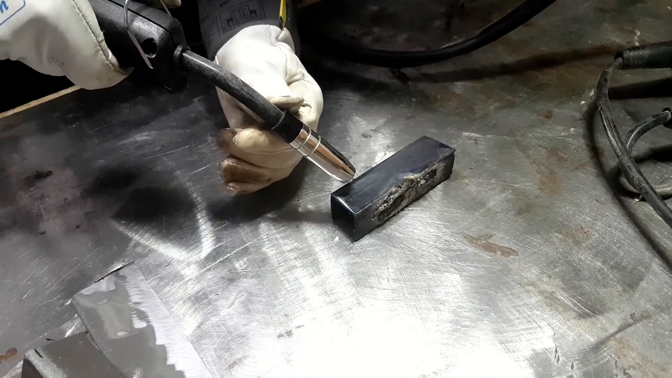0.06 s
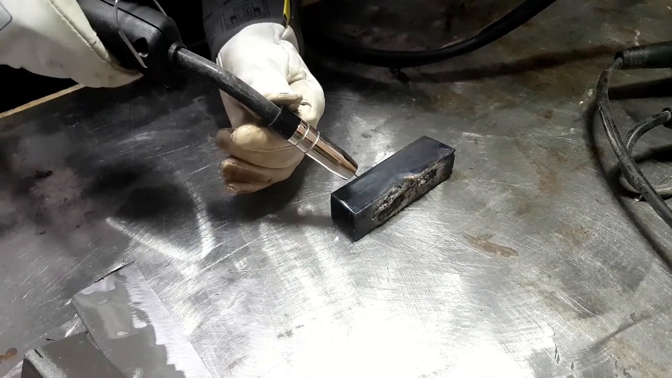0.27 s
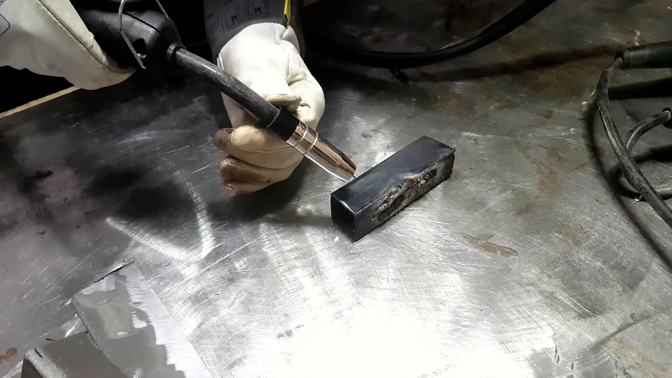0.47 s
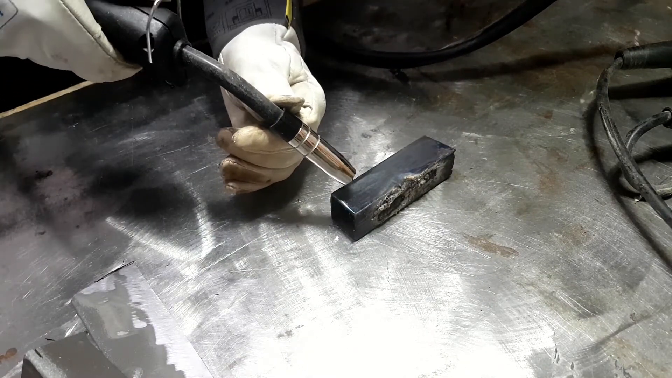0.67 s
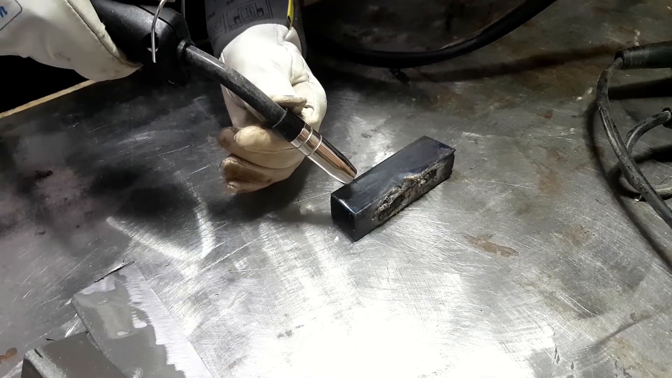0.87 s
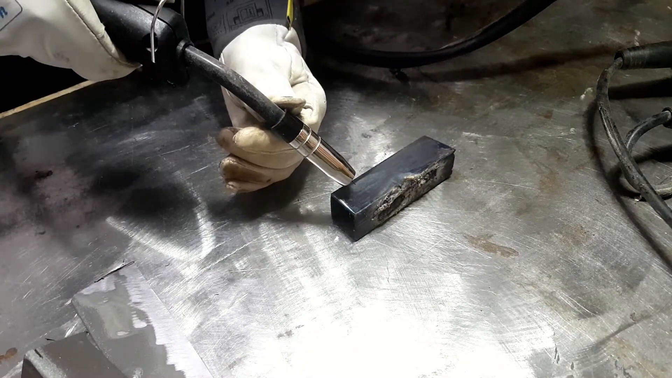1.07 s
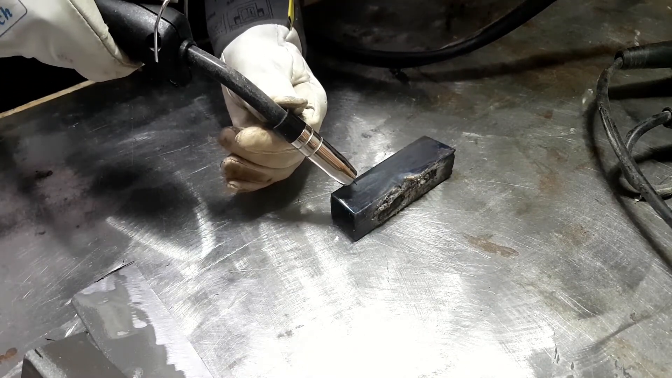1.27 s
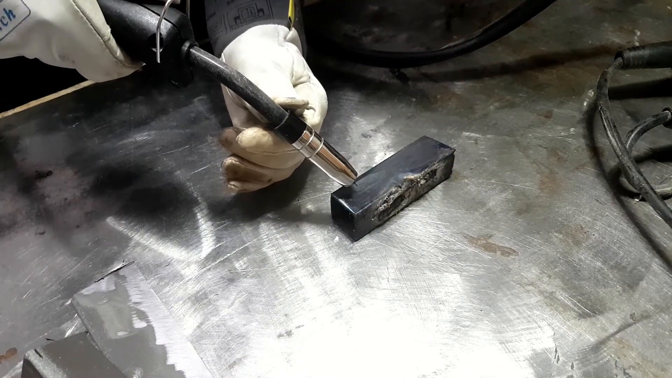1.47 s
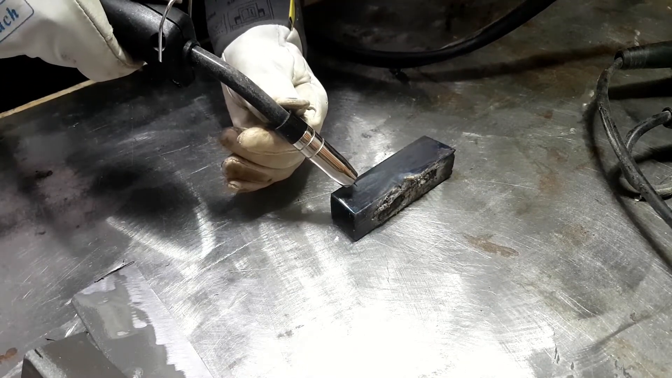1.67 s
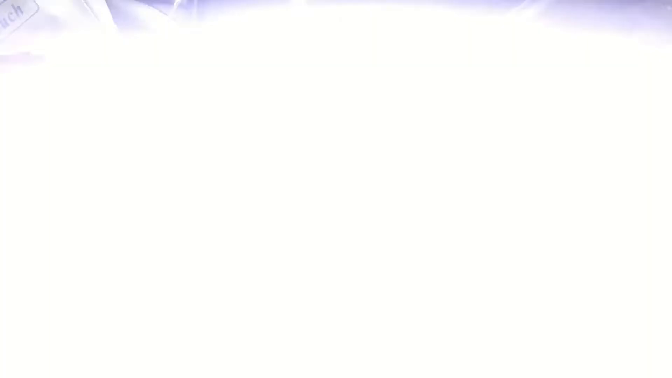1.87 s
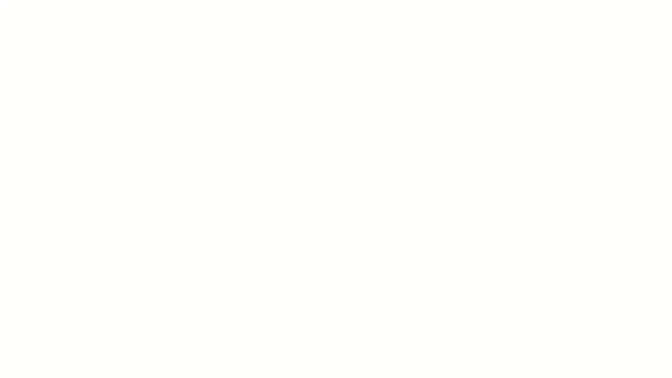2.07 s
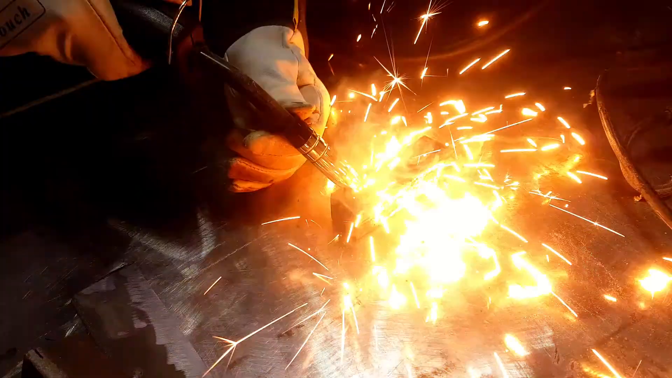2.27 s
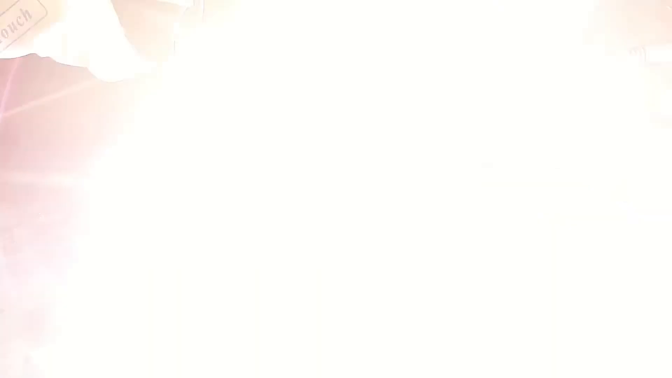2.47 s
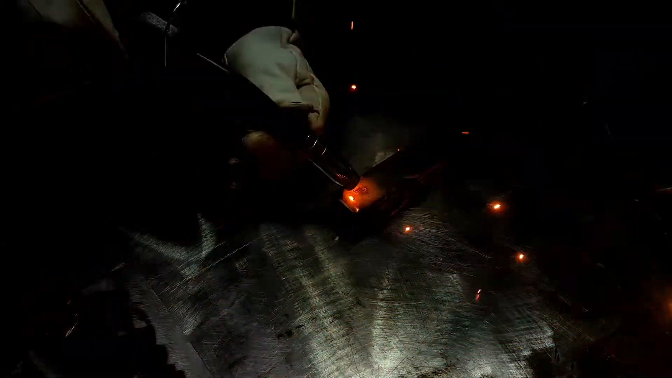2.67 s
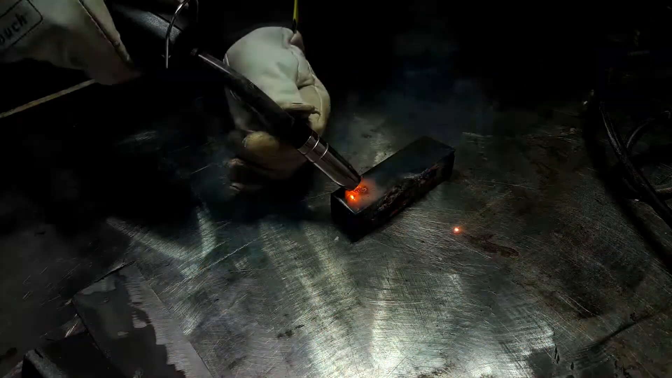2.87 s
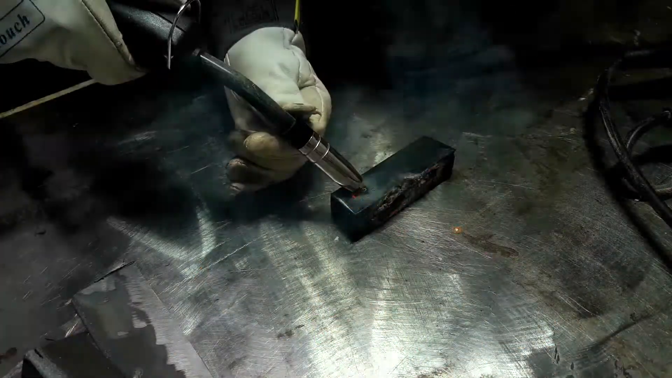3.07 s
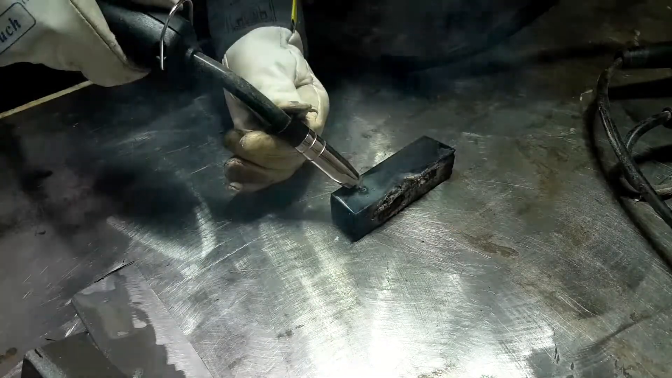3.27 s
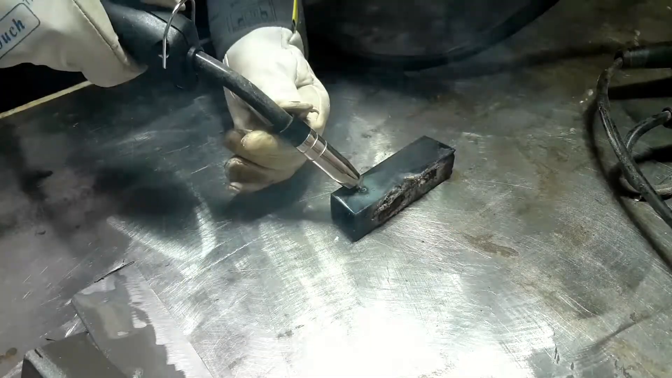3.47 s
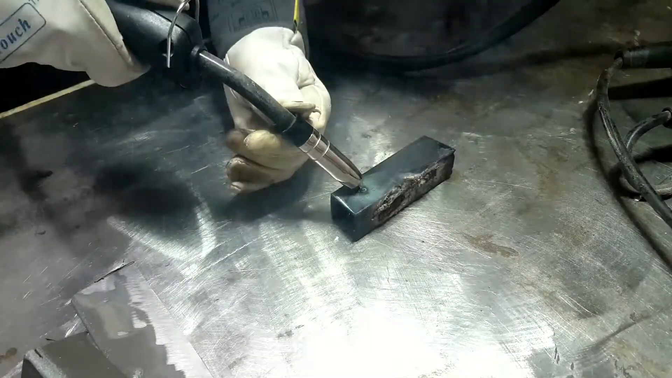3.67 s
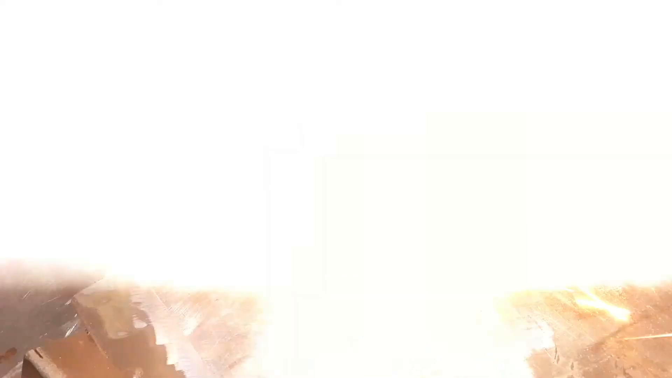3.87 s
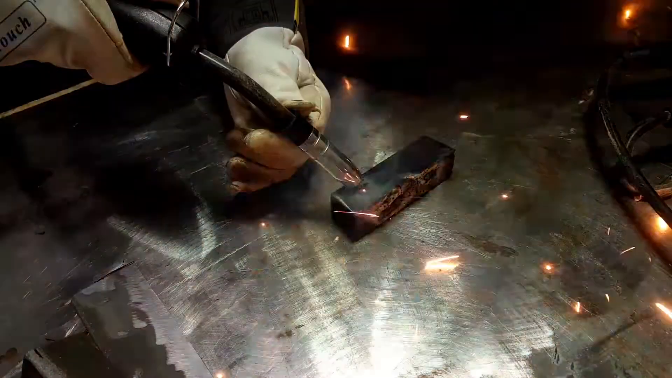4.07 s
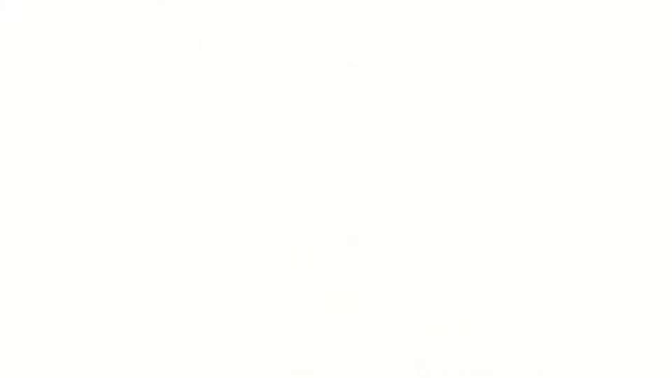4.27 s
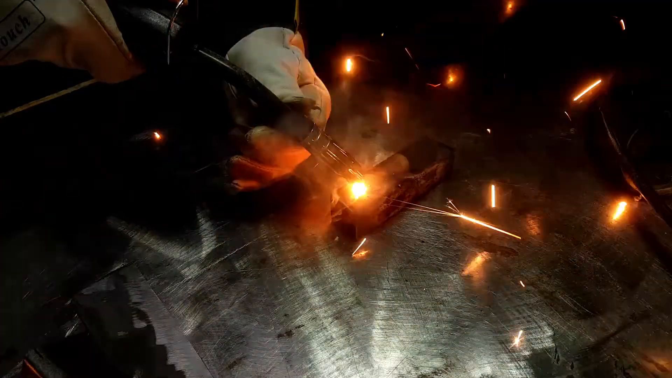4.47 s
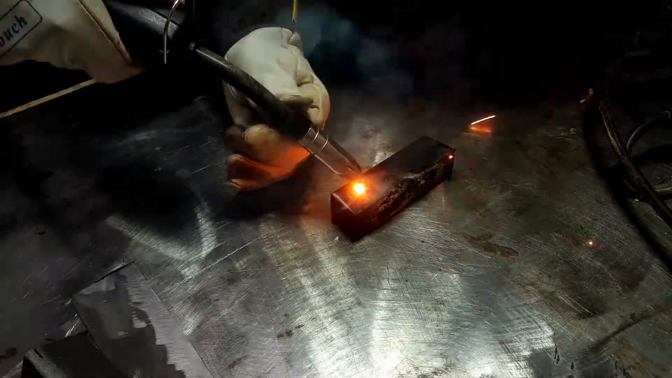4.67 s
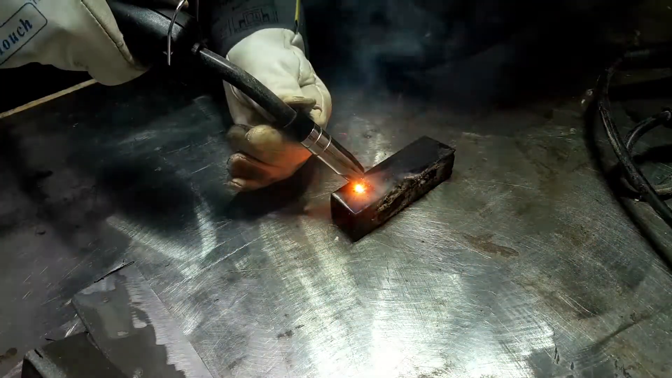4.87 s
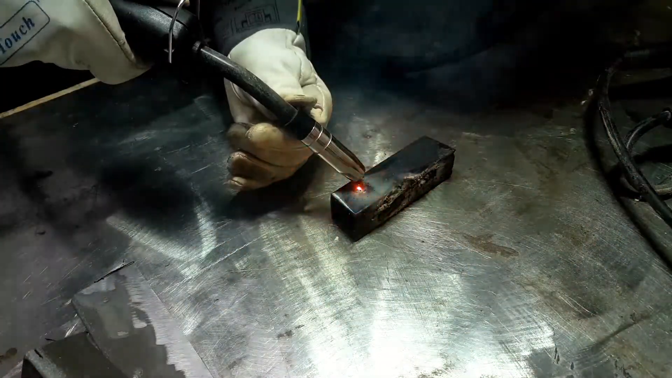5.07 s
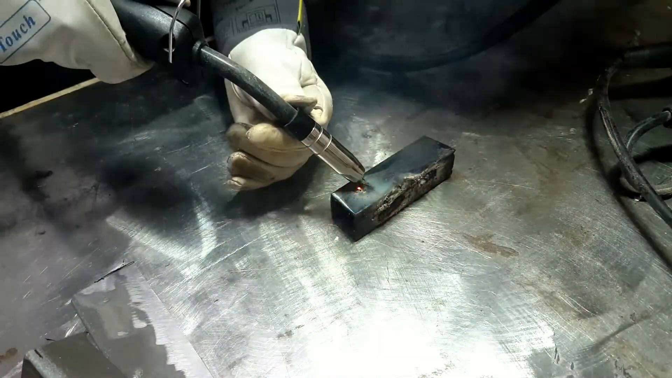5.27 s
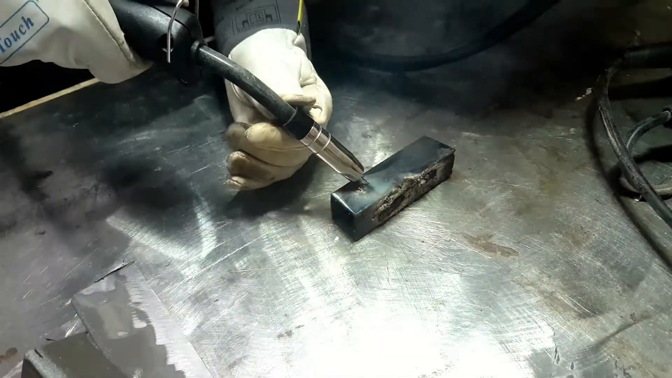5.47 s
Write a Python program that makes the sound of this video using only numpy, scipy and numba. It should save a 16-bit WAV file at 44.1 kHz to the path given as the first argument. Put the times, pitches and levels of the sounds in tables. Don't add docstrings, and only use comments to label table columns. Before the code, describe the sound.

Close up in a small workshop, sharp sputtering welding bursts pop and sizzle, separated by a humming fan, trigger clicks and dull metal clunks.

```python
import sys
import numpy as np
from scipy import signal
from scipy.fft import rfft, irfft, next_fast_len
from scipy.io import wavfile
from scipy.ndimage import uniform_filter1d, map_coordinates
from numba import njit

SR = 44100
rng = np.random.default_rng(int(sys.argv[2]) if len(sys.argv) > 2 else 0)


def wav_record(signal):
    frames = np.transpose(np.atleast_2d(signal))
    bounded = np.clip(frames, -1, 1)
    quanta = np.round(bounded * 32767).astype(np.int16)
    wavfile.write(sys.argv[1], SR, quanta)


def invert_db(level):
    return 10 ** (np.asarray(level, dtype=float) / 20)


N = 243873

# t/s, level/dB
FAN_GAIN = [(0, -1), (1.85, -1.5), (2.3, -1), (2.6, -7.5), (2.95, -5.5), (3.2, -2), (3.95, -1), (4.2, -5.5),
            (4.78, -10), (5.0, -4.5), (5.53, -0.5)]
# multiple/1, level/dB, left-right/dB
FAN_LINES = [(1, -72.5, 1.5), (4, -57, 1), (4.88, -79.5, -10), (6.938, -50.5, -7), (12, -71.5, -10),
             (14, -54.5, -3), (16, -65, 5), (20, -69.5, 4), (24, -62.5, 0.5), (28, -70.5, 7),
             (35, -74, -1.5)]
# f/Hz, density/dB
AIR_TONE = [(20, -21), (45, -13.5), (110, -12.5), (160, -11.5), (225, -2), (285, -5.5), (420, -5),
            (485, -4.5), (530, -12.5), (940, -16), (1100, -18.5), (3000, -28), (8500, -43.5), (15500, -46)]
# f/Hz, left-right/dB
AIR_LEFT = [(100, -4), (200, -1.5), (380, -2.5), (700, 2.5), (1300, -0.5), (15000, 1)]
AIR_DB, FAN_LAG_SAMPLES = -48, 11
SHAFT_HZ, SHAFT_HZ_PER_S = 63.54, .21
OVERTONE_IDLE_DB, OVERTONE_WELD_DB, OVERTONE_SAG = 2.5, -1, 0.63
RUMBLE_DB, WIND_CUT_DB, WIND_CUT_S = 0.5, -11.5, 0.94

# t/s, top peak level/dB, 1.7 kHz ring over top/dB, 3 kHz ring over
# top/dB
TICKS = [(0.371, -51, -7, -11), (1.4528, -40.5, -13, 0), (3.149, -50, -10, -2), (3.153, -40.5, -1.5, -2),
         (3.354, -60, 0, 3), (3.989, -45, -18, -19.5), (4.696, -57.5, -7, 1.5), (4.7, -44, -3, -3)]
# t/s, top peak level/dB, 1.7 kHz ring over top/dB, 3 kHz ring over top/dB
SNAPS = [(1.292, -35, -18, -2.5), (1.2965, -36, -6, -4), (2.7331, -54.5, 16, 11.5), (3.4325, -36, -14, 2.5),
         (3.441, -36, -6, -7), (4.8326, -46.5, -16, 2), (4.838, -41, -20, 1.5), (4.8436, -32, 3.5, 0)]
# t/s, top peak level/dB, 1.7 kHz ring over top/dB, 3 kHz ring over top/dB
TICKS_LEFT = [
    (0.1114, -39.5, 7.8, 10),
    (0.1174, -74, 13, 4),
    (0.5279, -55, 12, 12),
]
# f/Hz, density/dB
TICK_TONES = [
    [(3000, -38), (6500, -29), (8000, -11), (9500, -14.5), (12000, -6), (14500, -5.5), (15800, -6)],
    [(400, -50), (1200, -10), (1700, 0), (2100, -10), (5000, -50)],
    [(1000, -50), (2200, -16), (2600, -4), (3100, -14), (3750, 0), (4400, -14), (9000, -50)],
    [(2500, -69), (5200, -11), (6700, -10.5), (8500, -18), (14000, -32)],
]
# 6.5 kHz ring over top/dB, rattle/s, downward lean of 3 kHz ring/dB
TICK_KINDS = [(-9.5, 0.0036, 1), (-5, 0.0025, 5.5), (6, 0.0019, 0)]
# f/Hz, share/1
TICK_LEAN = [(2700, 1), (3600, -1)]
TICK_TAIL_DB, TICK_TAIL_S = -22, 0.059

# t/s, peak level/dB
CLUNKS = [(1.452, -33.5), (2.731, -34.5), (2.744, -35.5), (2.804, -39.5), (4.537, -46.5), (4.549, -40),
          (4.844, -23.5), (4.851, -29)]
# f/Hz, level/dB, t60/s
CASE_MODES = [(237, 2, 0.059), (313.8, 6.5, 0.11), (447, -29, 0.065), (501, -3, 0.26), (584, -2, 0.12),
              (674, -5, 0.32), (720, 3, 0.064), (910, -49, 0.04)]

# t/s, sizzle level/dB, crater depth/1 (0 flat, 1 deep)
BURNS = [
    [(1.877, -30.5, 0.5), (1.895, -29, 0.01), (1.955, -32.5, 0.2), (1.965, -28.5, 0.3), (2.04, -27, 0.8),
     (2.146, -26, 0.7), (2.204, -26, 1), (2.236, -26, 0.92), (2.256, -41, 0.98)],
    [(2.368, -31.5, 0.5), (2.38, -35.5, .1), (2.391, -24.5, .1), (2.439, -28.5, 0.5), (2.473, -35, 0.9),
     (2.5, -40.5, 0)],
    [(3.728, -21, 0.3), (3.758, -27.5, 0.12), (3.812, -27, 0.85), (3.868, -28.5, .9), (3.878, -24.5, .7),
     (3.89, -45, .7)],
    [(4.213, -36, 0.3), (4.232, -30, 0.01), (4.246, -28, 0.07), (4.324, -40, 1), (4.346, -34, .9),
     (4.36, -47, .8), (4.384, -41, 0.7), (4.395, -59, 0.62)],
]
# f/Hz, density/dB
ARC_TONE = [(40, -27.5), (80, -16), (200, -4.5), (700, -2.5), (1300, 3), (1800, -2), (2500, -3),
            (3800, -1.5), (5500, 0), (9000, -5), (12700, 2), (15500, -4)]
# f/Hz, left-right/dB
ARC_LEFT = [(60, 12.5), (110, 11.5), (200, -2), (380, -21.5), (700, -12), (1290, 1), (2380, 9.5),
            (4400, 2.5), (8120, -4.5), (15000, -8)]
ARC_EDGES = [950, 3400, 7800]
# flat-crater level over sizzle/dB, added when deep/dB
STREAM = [(4, -12.5), (-7.5, 11.5), (-2.5, 0), (3, -7.5)]
# t/s, crack peak level/dB, droplet weight/dB
POPS = [(1.8791, -6, -2), (1.8834, -3, 4.5), (1.8916, -13.5, 2), (1.8986, -15.5, 2.5),
        (1.9081, -8.5, -1.5), (1.9201, -12.5, 3), (1.948, -12, -2.5), (1.9589, -17.5, -6.5),
        (1.9655, -17, -2.5), (1.9859, -15.5, -5), (2.037, -13, -1), (2.0947, -13.5, 3),
        (2.1344, -11.5, 0), (2.148, -9.5, 6), (2.1709, -7.5, -2), (2.1846, -13.5, -3),
        (2.194, -13.5, -2.5), (2.202, -13.5, 1.5), (2.2104, -9.5, 3.5), (2.2173, -10, -2),
        (2.2288, -12.5, 2), (2.233, -5, 10), (2.3705, -1.5, -0.5), (2.3809, -2, 3.5),
        (2.3893, -9.5, 13), (2.403, -14, -2.5), (2.4087, -13, -2), (2.4923, -26.5, -5),
        (2.4965, -21, 13.5),
        (3.7302, -3, 3), (3.7337, -8, 7), (3.751, -9, -0.5), (3.755, -12.5, -7), (3.7777, -11.5, 0),
               (3.789, -9, 5), (3.8008, -7.5, 6.5), (3.817, -9, 1), (3.8239, -15.5, 4.5), (3.8564, -11, 8),
               (3.8766, -11, 9), (4.2162, -5.5, -1), (4.2247, 0, 4), (4.2311, -3.5, 1), (4.2347, -16.5, 12),
               (4.2433, -16.5, 2.5), (4.2611, -18, 1.5), (4.2891, -17, -1), (4.331, -24, 8),
               (4.3457, -19.5, 11), (4.3748, -14, 8.5), (4.3819, -21, 3)]
# level over crack/dB, added when deep/dB, share of droplet weight/1, rattle/s
BLOW = [(-4.5, -8, .9, 0.00091), (-7.5, 7.5, 0.78, 0.0014), (1, 1.5, -1.2, .0007),
        (1.5, 2.5, -1.1, 0.00077)]
# t/s, share/1, f/Hz
WHISTLE = [(1.94, .1, 3050), (1.97, 1.9, 3050), (2.1, 1.1, 3020), (2.135, 0.66, 2450), (2.25, 0.33, 2350),
           (2.37, 0.056, 2350)]
CRATER_FLAT_HZ, CRATER_DEEP_HZ = 1630, 1870
SMALL_POPS_PER_S, SMALL_POP_DB, SMALL_SCATTER_DB = 45, 5.5, 6
PORT_LAG_SAMPLES = 0.71

# t/s, level/dB
SNUFFS = [(2.236, -28.5), (2.497, -21.5), (3.877, -30), (4.383, -32)]
SNUFF_S, REBOUND = 0.00082, 2.8

# t/s, level/dB, decay/s
PUFFS = [(4.215, -14.5, 0.0091)]

# t/s, level/dB
SCRAPE = [(5.519, -59), (5.524, -32.5), (5.53, -18)]
# f/Hz, density/dB
SCRAPE_TONE = [(240, -35), (400, -12), (1840, -3), (2710, -21), (4260, -1), (5220, 2), (5820, -36),
               (14100, -36.5), (16500, -25.5)]

# f/Hz, t60/s
ROOM_T60 = [(60, 0.46), (250, 0.41), (1000, 0.29), (2300, 0.29), (5000, 0.23), (10000, 0.3), (16000, 0.072)]
ROOM_DB = -8.5
BENCH_HZ, BENCH_DB, BENCH_T60_S = 2318, -7, 0.27


def read(table, hz):
    f, v = np.transpose(table)
    return np.interp(np.log(np.maximum(hz, 1)), np.log(f), v)


def colour(x, table, tilt=((1, 0), (2, 0)), share=0):
    hz = np.arange(4097) * SR / 8192
    gain_db = read(table, hz) + share * read(tilt, hz)
    cepstrum = irfft(gain_db * np.log(10) / 20)
    cepstrum[1:4096] *= 2
    cepstrum[4097:] = 0
    h = irfft(np.exp(rfft(cepstrum)))[:4096]
    return signal.fftconvolve(x, h / np.sqrt(np.sum(h ** 2)))[:len(x)]


def band(x, lo_hz, hi_hz):
    hi_hz = min(hi_hz, .45 * SR)
    sos = signal.butter(2, [lo_hz, hi_hz], "band", fs=SR, output="sos")
    return signal.sosfilt(sos, x) * np.sqrt(SR / 2 / (hi_hz - lo_hz))


def walk(rate_hz):
    k = int(SR / rate_hz)
    held = np.repeat(rng.standard_normal(N // k + 1), k)
    return 1.22 * uniform_filter1d(uniform_filter1d(held, k), k)[:N]


def bursts(times_s, dbs, decays_s, noise):
    env = np.zeros(N)
    for s, db, decay_s in zip(times_s, dbs, np.broadcast_to(decays_s, len(times_s))):
        i = int(s * SR)
        age = np.arange(min(12000, N - i))
        env[i:i + len(age)] += invert_db(db) * np.exp(-age / (SR * max(decay_s, 1e-4)))
    return env * noise


def late(x, lag_samples):
    n = np.arange(N)
    return np.array([np.interp(n - lag_samples, n, x), x])


@njit
def svf(x, hz, width_hz):
    y, b, l = np.empty(len(x)), 0., 0.
    for i in range(len(x)):
        g, k = np.tan(np.pi * hz[i] / SR), width_hz / hz[i]
        v = (b + g * (x[i] - l)) / (1 + g * (g + k))
        b, l, y[i] = 2 * v - b, l + 2 * g * v, k * v
    return y


def slices(edges_hz):
    hz = np.arange(next_fast_len(N) // 2 + 1) * SR / next_fast_len(N)
    below = [0 * hz] + [1 / (1 + (hz / e) ** 6) for e in edges_hz] + [0 * hz + 1]
    return np.diff(below, axis=0)


def fan_lines(shaft_hz, overtone_db, rumble_db):
    turn = 2 * np.pi * np.cumsum(shaft_hz * (1 + .002 * walk(6))) / SR
    lines = 0
    for k, db, left_db in FAN_LINES:
        db = db + 1.4 * walk(24.915) + overtone_db * (k > 7) + rumble_db * (k < 5)
        tone = np.sqrt(2) * invert_db(db) * np.sin(round(k) * turn + 2 * np.pi * rng.random())
        lines = lines + invert_db([[left_db / 2], [-left_db / 2]]) * tone
    lines[0] = np.roll(lines[0], FAN_LAG_SAMPLES)
    return lines


def fan_air(rumble_db):
    noise = rng.standard_normal((3, N))
    high = signal.butter(1, 500, "high", fs=SR, output="sos")
    around = signal.sosfilt(high, noise[1:]) + 0.3 * noise[1:]
    left, right = late(noise[0], FAN_LAG_SAMPLES) + 1.41 * around
    air = np.array([colour(left, AIR_TONE, AIR_LEFT, share=.5), colour(right, AIR_TONE, AIR_LEFT, share=-.5)])
    bass = signal.sosfiltfilt(signal.butter(2, 270, fs=SR, output="sos"), air)
    air = air - bass * (1 - invert_db(rumble_db + 0.5 * walk(5.6)))
    return invert_db(AIR_DB + walk(3.4)) * air / np.std(air)


def fan():
    t = np.arange(N) / SR
    gain_db = np.interp(t, *np.transpose(FAN_GAIN))
    weld_db = OVERTONE_WELD_DB + OVERTONE_SAG * gain_db
    overtone_db = np.where(t < BURNS[0][0][0], OVERTONE_IDLE_DB, weld_db)
    rumble_db = RUMBLE_DB + WIND_CUT_DB * np.clip((t - PUFFS[0][0]) / WIND_CUT_S, 0, 1)
    lines = fan_lines(SHAFT_HZ + SHAFT_HZ_PER_S * t, overtone_db, rumble_db)
    return invert_db(gain_db) * (lines + fan_air(rumble_db))


def ticks():
    out = 0
    tables, lags = (TICKS, SNAPS, TICKS_LEFT), (FAN_LAG_SAMPLES, FAN_LAG_SAMPLES, -8)
    for k, tone in enumerate(TICK_TONES):
        noise = rng.standard_normal((3, N))
        for table, lag, (high_db, rattle_s, lean_db) in zip(tables, lags, TICK_KINDS):
            s, top_db, low_db, mid_db = np.transpose(table)
            db = top_db + (0, low_db, mid_db, high_db)[k] - 5
            grit = 0.13 * late(noise[0], lag) + 1.01 * noise[1:]
            shake = bursts(s, db, rattle_s, grit) + bursts(s, db + TICK_TAIL_DB, TICK_TAIL_S, grit)
            lean = lean_db * (k == 2)
            out = out + np.array([colour(port, tone, TICK_LEAN, share=lean) for port in shake])
    return out


def clunks():
    out, t = np.zeros(N), np.arange(SR // 4) / SR
    for s, db in CLUNKS:
        ring = 0
        for hz, mode_db, t60_s in CASE_MODES:
            c = rng.standard_normal()
            mode = np.sin(2 * np.pi * hz * t + 3 * c) * 10 ** (-3 * t / t60_s)
            ring = ring + invert_db(mode_db + 4.1 * c) * mode
        ring = ring * (1 - np.exp(-t / 0.0022))
        i = int(s * SR)
        out[i:i + len(t)] += invert_db(db - 2.5) * ring / np.max(np.abs(ring))
    s, db = np.transpose(CLUNKS)
    shake = bursts(s + 0.0022, db - 26.0, 0.031, rng.standard_normal(N))
    rattle = band(band(shake, 280, 1100), 280, 1100)
    return late(out + rattle, FAN_LAG_SAMPLES)


def plasma():
    chance = rng.random((3, N))
    struck = chance[0] < 1500 / SR
    spatter = struck * np.sign(chance[1] - .5) * invert_db(-2.5 * np.log(chance[2] + 1e-9))
    hiss = invert_db(2.73 * walk(150)) * (rng.standard_normal(N) + .9 * rng.standard_normal((2, N)))
    stream = 0.57 * spatter / np.std(spatter) + hiss
    return stream / np.std(stream)


def pops(sizzle_db):
    small = np.flatnonzero((rng.random(N) < SMALL_POPS_PER_S / SR) & (sizzle_db > -100))
    scatter_db = SMALL_SCATTER_DB * (rng.random((2, len(small))) - .5)
    small_db = sizzle_db[small] + SMALL_POP_DB + scatter_db[0]
    big = np.transpose(POPS)
    return np.hstack([big, [small / SR, small_db, 2 * scatter_db[1]]])


def arc():
    t, sizzle_db, n_fft = np.arange(N) / SR, np.full(N, -300.), next_fast_len(N)
    for burn in BURNS:
        s, db, _ = np.transpose(burn)
        on = slice(int(s[0] * SR), int(s[-1] * SR))
        sizzle_db[on] = np.interp(t[on], s, db)
    rows = np.concatenate(BURNS)
    depth = np.interp(t, rows[:, 0], rows[:, 2])
    stream = plasma()
    s, db, weight_db = pops(sizzle_db)
    at = (s * SR).astype(int)
    noise = rng.standard_normal((2, N))
    rattle = noise + 0.45 * noise[::-1]
    parts = []
    for (flat_db, deep_db), (blow_db, sunk_db, heavy, rattle_s), share in zip(STREAM, BLOW, slices(ARC_EDGES)):
        level = invert_db(sizzle_db + flat_db + deep_db * depth)
        pop_db = db + blow_db + sunk_db * depth[at] + heavy * weight_db
        click = np.zeros(N)
        click[at] = invert_db(pop_db - 6.0) / np.mean(share)
        gas = invert_db(-4.0) * level * stream + bursts(s + 0.00016, pop_db - 12, rattle_s, rattle)
        both = click + gas / np.sqrt(np.mean(share ** 2))
        parts.append(irfft(rfft(both, n_fft) * share, n_fft)[:, :N])
    roar, ring, sizzle, top = parts
    crater_hz = CRATER_FLAT_HZ + (CRATER_DEEP_HZ - CRATER_FLAT_HZ) * depth
    crater = np.array([svf(port, crater_hz, 290.0) for port in ring])
    s, share, hz = np.transpose(WHISTLE)
    whistle_hz = np.interp(t, s, hz)
    nozzle = np.interp(t, s, share) * np.array([svf(port, whistle_hz, 290.0) for port in ring])
    return roar + 0.43 * ring + 0.78 * crater + nozzle + sizzle + top


def arc_heard():
    left, right = arc()
    right = map_coordinates(right, [np.arange(N) - PORT_LAG_SAMPLES], mode="mirror")
    left = invert_db(3.5) * colour(left, ARC_TONE, ARC_LEFT, share=0.15)
    right = invert_db(0.17) * colour(right, ARC_TONE, ARC_LEFT, share=0.031)
    return np.array([left, right])


def snuffs():
    t, out = np.arange(N) / SR, 0
    for s, db in SNUFFS:
        age = np.clip(t - s, 0, None) / SNUFF_S
        out = out - invert_db(db) * age * (np.exp(1 - age) - np.exp(1 - age / REBOUND) / REBOUND ** 2)
    return band(out, 90, 6000) / 2


def puffs():
    s, db, decay_s = np.transpose(PUFFS)
    push = band(bursts(s, db, decay_s, rng.standard_normal(N)), 21, 107.7)
    return np.array([push, 0.38 * push])


def scrape():
    s, db = np.transpose(SCRAPE)
    env = invert_db(np.interp(np.arange(N) / SR, s, db, left=-200))
    return late(env * colour(rng.standard_normal(N), SCRAPE_TONE), 3.6)


def echoes(x, gap_s):
    t, tail = np.arange(SR // 2) / SR, 0
    for hz in 45 * 2. ** np.arange(9):
        mid, side = rng.standard_normal((2, len(t)))
        apart = np.clip(.25 + hz / 2500, 0, 1)
        pair = (mid + apart * side * np.array([[1], [-1]])) / np.sqrt(1 + apart ** 2)
        pair = band(pair, hz / np.sqrt(2), hz * np.sqrt(2)) * np.sqrt(hz)
        tail = tail + pair * 10 ** (-3 * t / read(ROOM_T60, hz))
    bench = band(rng.standard_normal((2, len(t))), BENCH_HZ - 300, BENCH_HZ + 300)
    bench = bench * 10 ** (-3 * t / BENCH_T60_S)
    tail = tail / np.std(tail) + invert_db(BENCH_DB) * bench / np.std(bench)
    tail = tail * np.clip(t / gap_s - 1, 0, 1)
    tail = tail / np.sqrt(np.mean(np.sum(tail ** 2, axis=1)))
    return signal.fftconvolve(x[None], tail, axes=1)[:, :N]


def scene():
    hits = arc_heard() + snuffs() + ticks() + clunks() + scrape()
    room = invert_db(ROOM_DB) * echoes(hits.mean(axis=0), 0.0022)
    return fan() + hits + room + puffs()


def top_cut(x):
    return signal.sosfilt(signal.butter(12, 16980, fs=SR, output="sos"), x)


def record(dry):
    firm = signal.sosfilt(signal.butter(1, 40, "high", fs=SR, output="sos"), dry)
    loud = .85 * np.tanh(firm / .85)
    dull = signal.sosfiltfilt(signal.ellip(6, .1, 40, 15900, fs=SR, output="sos"), loud)
    offset = -.0004
    return top_cut(dull + invert_db(-35.5) * (loud - dull) + offset)


dry = scene()
out = record(dry)
wav_record(out)
```